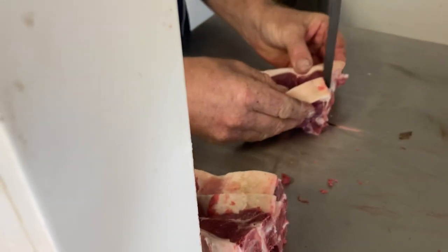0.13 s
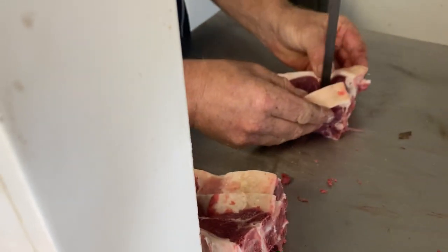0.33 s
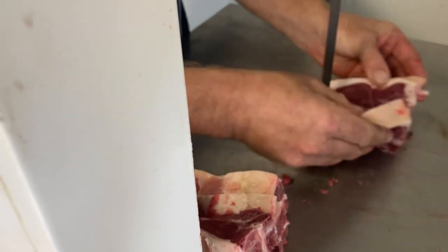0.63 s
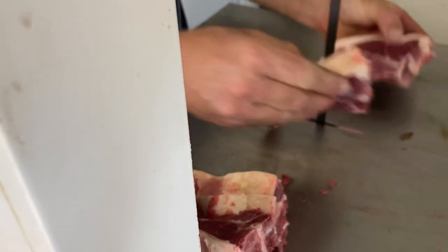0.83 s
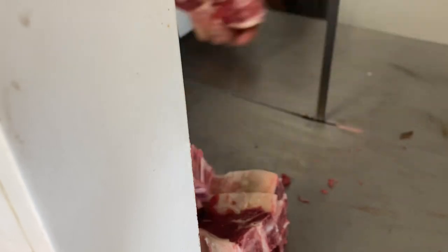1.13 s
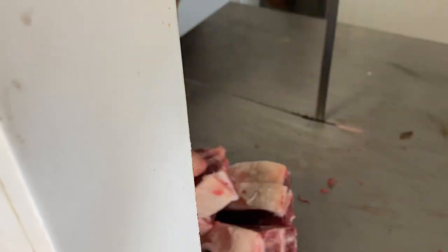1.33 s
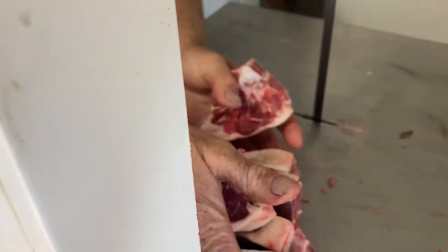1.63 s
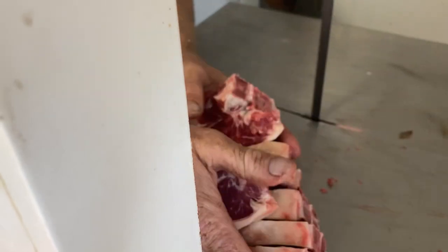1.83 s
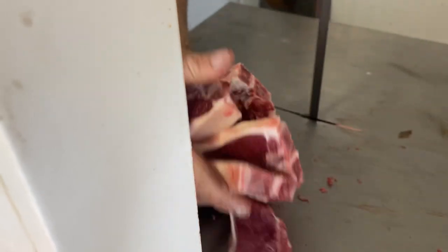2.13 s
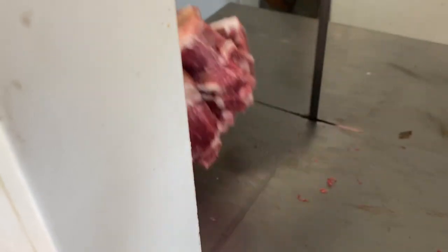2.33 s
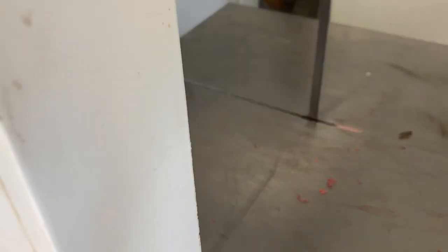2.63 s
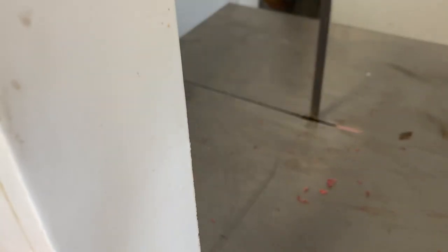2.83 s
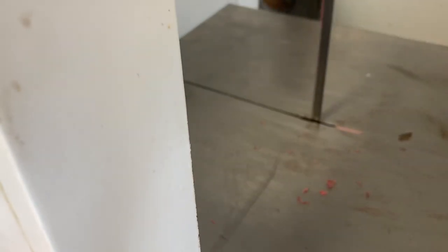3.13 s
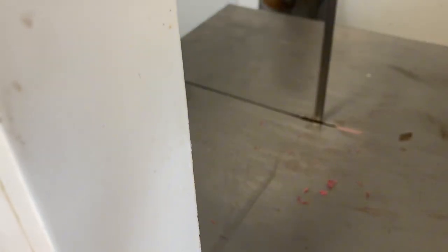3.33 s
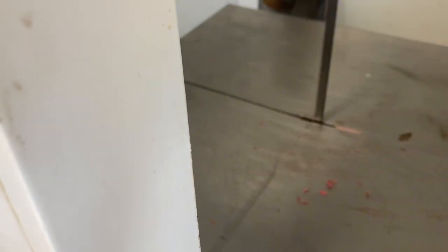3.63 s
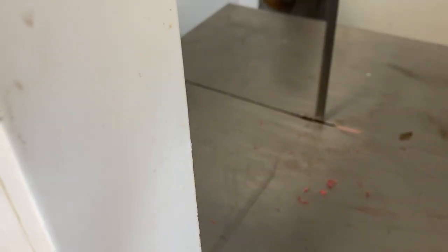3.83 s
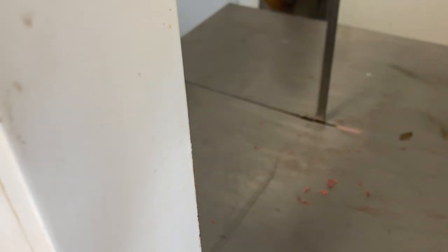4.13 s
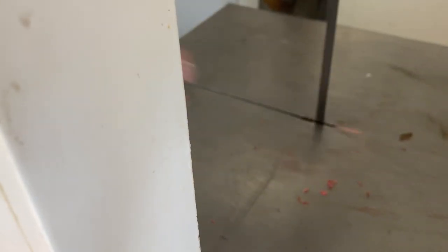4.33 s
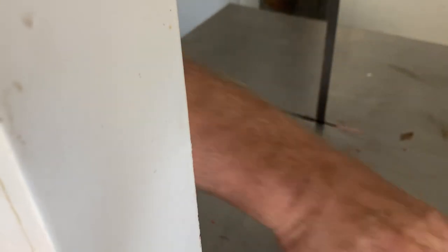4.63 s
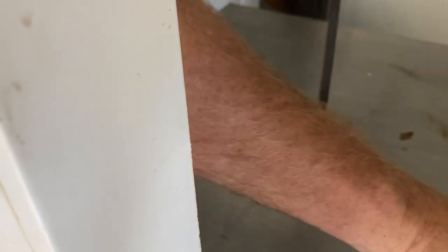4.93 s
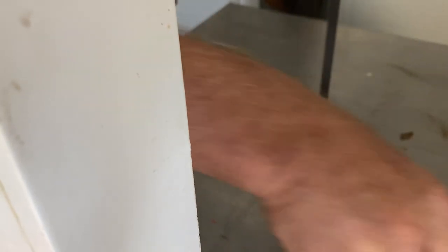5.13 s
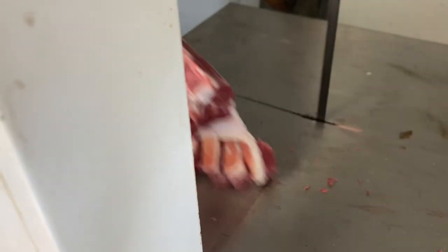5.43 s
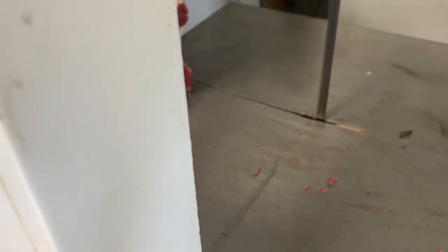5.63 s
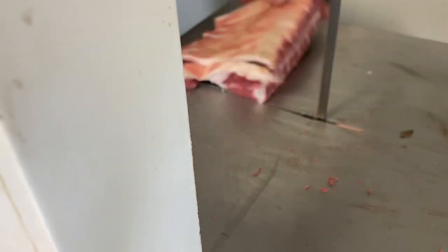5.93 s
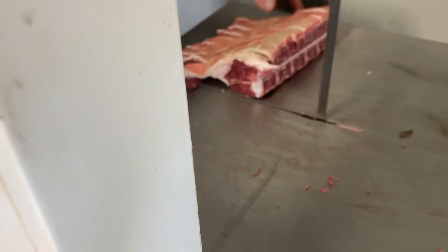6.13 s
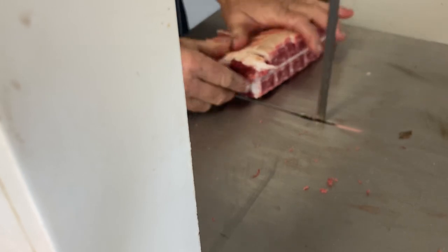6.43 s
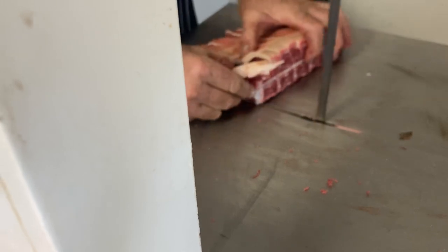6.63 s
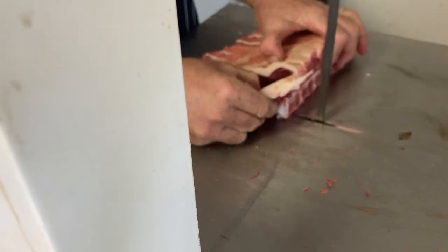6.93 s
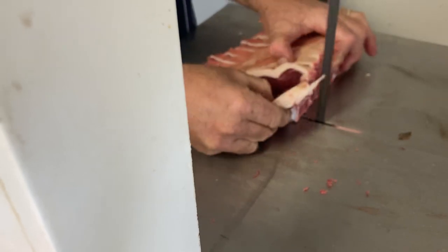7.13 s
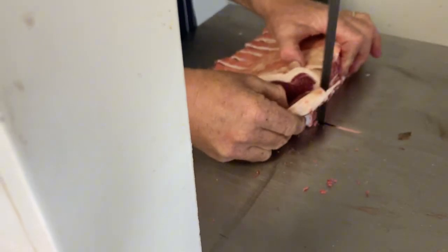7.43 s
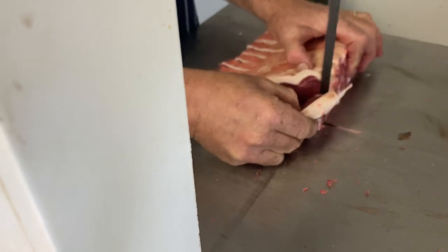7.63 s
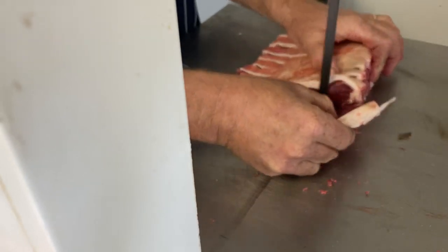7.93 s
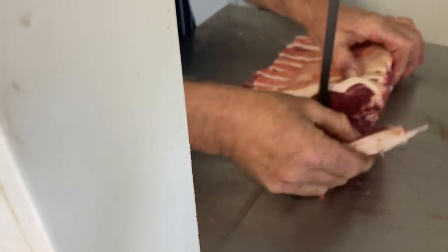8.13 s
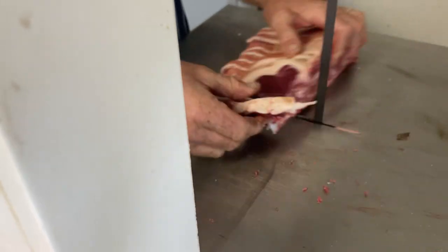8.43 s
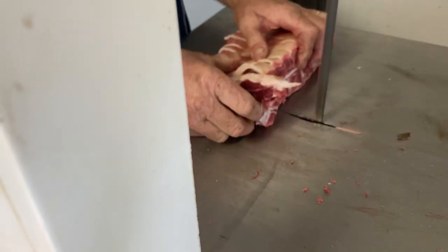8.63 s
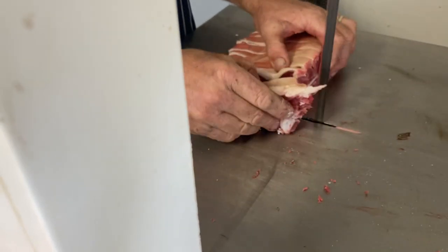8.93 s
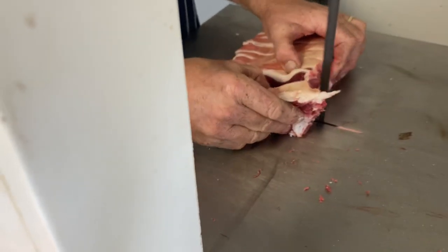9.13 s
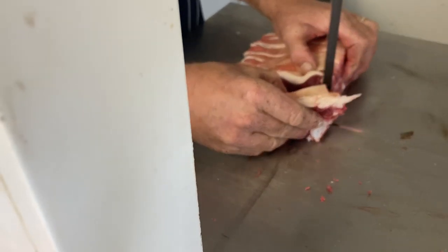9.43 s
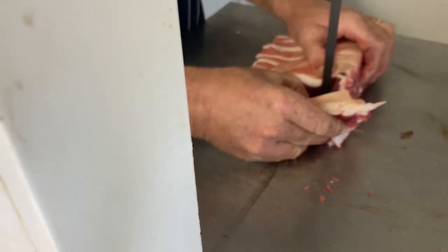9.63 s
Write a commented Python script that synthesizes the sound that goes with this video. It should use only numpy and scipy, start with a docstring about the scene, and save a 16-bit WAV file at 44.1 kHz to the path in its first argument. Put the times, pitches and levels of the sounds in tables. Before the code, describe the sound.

Close by a butcher's bandsaw in a hard-walled workroom, a low motor hum throbs unevenly about two and a half times a second, with band whirr, faint bearing whine and fine wet hiss. From 0 to 0.3 seconds teeth rasp harshly through meat on the bone; a second bite from about 0.4 snags, chatters and gives a rough, high squeal near 0.5. The cutting rings away and the hum returns. Small wet ticks come at intervals from 1.1 to 5.7. Between 2.0 and 3.1, nine soft low knocks repeat quickly and evenly; a brief scuff follows at 3.6. The saw runs freely, its hum growing stronger, until a bright cut at 7.5 chatters and sings, ending around 8 in a judder falling in pitch. A wet tick comes at 8.9. Another cut at 9.3 snags and rings, and its slice judders loose at 9.8. Hum and whirr dip during cuts.

```python
"""First a butcher's bandsaw rasps through meat on the bone, close by in a hard-walled workroom: chips make the rasp,
resonances and the tooth tone make the blade's free span chatter and ring, and the blade squeals once.
Under it tones make the motor hum and throb, and coloured noise makes the band whirr; both are quieter during cuts.
Between cuts: bursts of noise for wet ticks and one short scuff, low modes for a scrap knocking round with the wheel.
In the later cuts the slice comes away with a judder of falling pitch."""
import sys
import numpy as np
from scipy import signal
from scipy.fft import rfft, irfft, next_fast_len
from scipy.io import wavfile
from scipy.ndimage import map_coordinates

SR = 44100
rng = np.random.default_rng(int(sys.argv[2]) if len(sys.argv) > 2 else 0)


def store_pcm(level_fs):
    """Save levels as 16-bit WAV."""
    pcm = np.round(np.clip(level_fs, -1, 1) * 32767).astype(np.int16)
    wavfile.write(sys.argv[1], SR, np.atleast_2d(pcm).T)


N = 431738


def amp(db):
    """Decibels to gain."""
    return 10 ** (np.asarray(db) / 20)


def unit(x):
    """Scale to rms 1."""
    return x / np.sqrt(np.mean(x ** 2) + 1e-20)


def along(points, hz):
    """(Hz, value) points read on a log frequency axis."""
    f, v = np.transpose(points)
    return np.interp(np.log(hz + 1), np.log(f + 1), v)


def curves(rows):
    """One value per sample for each column after the time."""
    s, *cols = np.transpose(rows)
    return [np.interp(np.arange(N) / SR, s, c) for c in cols]


def wobble(rate):
    """A smooth random curve, rate knots a second."""
    count = int(N * rate / SR) + 4
    # a spline through the knots, read at eight points per knot
    fine = np.arange(count * 8) / 8
    smooth = map_coordinates(rng.standard_normal(count), [fine])
    return np.interp(np.arange(N) * rate / SR, fine, smooth)


def filtered(x, response):
    """x passed through a response given as a function of frequency."""
    m = next_fast_len(N + SR // 2)
    return irfft(rfft(x, m) * response(np.fft.rfftfreq(m, 1 / SR)), m)[:N]


def noise(spectrum):
    """Noise of rms 1 with the given colour."""
    return unit(filtered(rng.standard_normal(N), lambda f: amp(along(spectrum, f))))


def tone(hz):
    """A sine of rms 1 that follows a pitch curve."""
    return np.sqrt(2) * np.sin(2 * np.pi * np.cumsum(hz) / SR)


def add(track, s, sound):
    """Mix a sound into the track at time s."""
    part = track[round(s * SR):][:len(sound)]
    part += sound[:len(part)]


def resonances(modes, f):
    """Summed response of (Hz, width Hz, dB) resonances."""
    return sum(amp(db) * 1j * f * w / (c * c - f * f + 1j * f * w) for c, w, db in modes)


def envelope(start, length, shape):
    """Gain that rises to the start, tilts through the hold (1 at its middle) and dies away."""
    attack, db_per_s, t60 = shape
    gain = np.zeros(N)
    first = max(0, int((start - attack) * SR))
    last = min(N, int((start + length + 2 * t60) * SR))
    i = np.arange(first, last)
    t = i / SR - start
    rise = np.clip(1 + t / attack, 0, 1) ** 2
    tilt_db = db_per_s * (np.clip(t, 0, length) - length / 2)
    decay_db = -60 * np.maximum(t - length, 0) / t60
    gain[i] = rise * amp(tilt_db + decay_db)
    return gain


def chips(rate, scatter_db, life):
    """Teeth break off chips at uneven moments, each a burst of its own size that fades over its life (s)."""
    bites = (rng.random(N) < rate / SR) * amp(scatter_db * rng.standard_normal(N))
    force = signal.fftconvolve(bites, np.exp(-np.arange(SR // 50) / SR / life))[:N]
    return force * rng.standard_normal(N)


# The hum and whirr between cuts. Each row: time in seconds, level in dB before ducking and gains.
FREE_RUNNING = [(0.3, -22), (1.06, -25.5), (1.31, -20.5), (2.8, -20.5), (7.4, -15.5), (9.3, -16.5)]
DUCK_DB, DUCK_IN_S, DUCK_OUT_S = 5.5, 0.094, 0.12  # depth in the loudest cut, time to sink, time to return
DUCK_HOLD_S = 0.092  # the level stays down this long after a cut


def background_level():
    """Level in dB: the hum and whirr grow quieter during each cut, more in a louder one, then return."""
    t = np.arange(N) / SR
    duck = np.zeros(N)
    for s, length, _, rasp_db, *_ in CUTS:
        sinking = (t - s) / DUCK_IN_S
        returning = 1 - (t - s - length - DUCK_HOLD_S) / DUCK_OUT_S
        duck += np.clip(np.minimum(sinking, returning), 0, 1) * amp(rasp_db)
    return curves(FREE_RUNNING)[0] - DUCK_DB * (duck / duck.max()) ** 2


# Hum and shaft tones. Each row: pitch in Hz, relative level in dB, scale of the pitch wander in Hz.
HUM_TONES = [(100.2, -1, 0.085), (199.8, -22, 0.605), (88.8, -18, 1.16), (60.8, -34, 0.36),
             (221.6, -28, 2.01)]
# Tight spots in each lap of the band. Each row: place as share of the lap, typical dip of the hum in dB,
# half-width (to 1/e) as share of the lap.
TIGHT_SPOTS = [(.03, 4, 0.052), (.16, 2.5, 0.079), (.485, 6, 0.041), (.56, 3, 0.042), (.76, 2.5, 0.078)]
LAP_HZ = 2.519  # laps of the band a second


def motor(throb_db=0.38, uneven=0.18, gain_db=0.98):
    """Hum and shaft tones throb, sagging at each tight spot of the circling band."""
    lap = np.arange(N) / SR * LAP_HZ
    sag_db = np.zeros(N)
    for at, db, width in TIGHT_SPOTS:
        from_spot = (lap - at + .5) % 1 - .5
        sag_db += db * np.exp(-(from_spot / width) ** 2)
    swing_db = throb_db * wobble(17) - sag_db * (1 + uneven * wobble(6.9))
    # each sag also pulls the phase, so the side tones lie below the hum
    throb = np.conj(amp(signal.hilbert(swing_db, next_fast_len(N))[:N]))
    lines = np.zeros(N, complex)
    for hz, db, wander in HUM_TONES:
        lines += amp(db) * np.exp(2j * np.pi * np.cumsum(hz + wander * wobble(3)) / SR)
    return amp(background_level() + gain_db) * np.sqrt(2) * np.real(throb * lines)


def steel_table(x, ring_db=-6, t60=0.12):
    """The sheet-steel table adds a thicket of short-lived modes, made as decaying noise."""
    t = np.arange(SR // 5) / SR
    modes = rng.standard_normal(len(t)) * amp(-60 * t / t60)
    return unit(x + amp(ring_db) * signal.fftconvolve(x, modes / np.linalg.norm(modes))[:N])


# Whirr of the rubbing band. Each row: frequency in Hz, relative level in dB per Hz.
WHIRR_COLOUR = [(880, -42), (1500, -23), (1550, -8), (1980, -10), (2250, -12.5), (2390, -14.5),
                (2770, -2.5), (3250, -12.5), (3890, -13.5), (4220, -4.5), (4650, -3.5), (5650, -8.5),
                (6000, -18), (6570, -11), (9000, -29), (11700, -38), (19800, -120)]
# Rumble of wheels and housing. Each row: frequency in Hz, relative level in dB per Hz.
HOUSING_COLOUR = [(25, -22), (55, -13), (85, -18), (135, 2), (170, -4), (215, -2.5), (255, -6), (310, -8.5),
                  (375, -3), (490, -3.5), (600, -7), (800, -9.5), (1230, -5), (1450, -11.5), (1700, -26),
                  (2600, -54)]
# The band's resonances between its guides. Each row: centre in Hz, width in Hz, relative level in dB.
GUIDE_MODES = [(2466, 78, -1.5), (2690, 33, -6), (2863, 81, -4), (3653, 76, -10.5), (4320, 62, -11.5),
               (4613, 51, -4), (5515, 52, -5)]
# Bearing tones. Each row: mean pitch in Hz, relative level in dB.
BEARING_TONES = [(500.5, -12.5), (958, -18.5), (1249, -12.5), (1350, -16.5), (1453, -18), (2408, -16),
                 (2461, -14), (2677, -12.5), (2852, -17.5), (4323, -21), (4610, -21), (5566, -19.5),
                 (6379, -24)]


def running_band(below_hum_db=-18, frame_db=1, whirr_db=-2, guides_db=-6, flutter_db=0.5):
    """The band rubs its guides and shakes the housing; wheel bearings whine. All rise and fall with the hum."""
    level_db = background_level()
    steel = unit(filtered(rng.standard_normal(N), lambda f: resonances(GUIDE_MODES, f)))
    rub = amp(whirr_db) * steel_table(noise(WHIRR_COLOUR)) + amp(guides_db + 1.17 * wobble(12)) * steel
    housing = amp(frame_db + 0.92 * wobble(14)) * steel_table(noise(HOUSING_COLOUR))
    whine = np.zeros(N)
    for hz, db in BEARING_TONES:
        whine += amp(db + 2.35 * wobble(25)) * tone(hz + np.sqrt(hz) / 5 * wobble(70))
    return amp(level_db + below_hum_db) * (amp(flutter_db * wobble(22)) * rub + housing + whine)


# Fine hiss of the wet band. Each row: time in seconds, level in dB relative to the background level.
WET_LEVEL = [(0.9, -30.5), (2.5, -25.5), (3.4, -30), (4.7, -32), (5.65, -26), (6.4, -29.5), (7.25, -26.5),
             (8.6, -30.5)]
# Colour of hiss and specks. Each row: frequency in Hz, relative level in dB per Hz.
HISS_COLOUR = [(4120, -5), (7000, 1), (10100, 0), (15100, -1), (15700, -3)]


def wet_band(hiss_db=0.0, specks_db=-4.0):
    """Moisture hisses on the steel and specks of meat tick through the guides."""
    level_db = background_level() + curves(WET_LEVEL)[0]
    bursts = chips(rate=120, scatter_db=6, life=0.0037)
    specks = unit(filtered(bursts, lambda f: amp(along(HISS_COLOUR, f))))
    hiss = amp(hiss_db + 2.7 * wobble(25)) * noise(HISS_COLOUR)
    return amp(level_db) * (hiss + amp(specks_db) * specks)


# Modes of the blade's free span. Each row: centre in Hz, width in Hz, level in dB over the broad response.
BLADE_MODES = [(467, 24, 11.5), (705, 110, 1.5), (971, 78, 7.5), (1324, 29, 9.5), (1544, 35, 2.5),
               (1823, 36, 13), (2306, 53, 10.5), (2748, 34, 16), (3106, 160, 5), (3640, 47, 7),
               (4620, 53, 13.5), (5070, 92, 8.5), (5460, 90, 10), (6020, 87, 8), (6610, 130, 6),
               (7310, 140, 7.5), (8220, 53, 5), (8580, 56, 10), (9580, 70, 6), (10130, 37, -3)]


def blade_span(x, spectrum):
    """The free span of the blade rings in its modes on top of a broad response."""
    return unit(filtered(x, lambda f: amp(along(spectrum, f)) * (1 + resonances(BLADE_MODES, f))))


TOOTH_HZ = 924  # teeth passing a second, on average


def tooth_tone(waver_hz=16, flicker_db=2.5, octave_db=-14):
    """The teeth catch unevenly, so their tone and its octave are rough."""
    pitch = TOOTH_HZ + waver_hz * wobble(160)
    octave = amp(octave_db + 1.7 * wobble(60)) * tone(2 * pitch)
    return amp(flicker_db * wobble(60)) * (tone(pitch) + octave)


# Cuts through bone. Each row: start in seconds, length in seconds, time to enter in seconds, then levels in dB
# before each part's own gain: rasp of the teeth, deeper bite, blade chatter, blade ring.
CUTS = [(0.0, 0.27, 0.02, -25.5, -32.5, -36.5, -37.5), (0.381, 0.192, 0.049, -28.5, -37.5, -41.5, -49),
        (7.521, 0.26, 0.068, -21.5, -31, -43, -41.5), (9.334, 0.28, 0.011, -22.5, -36.5, -40, -41)]
# Colours of the teeth's rasp, the deeper bite and the blade's chatter.
# Each row: frequency in Hz, relative level in dB per Hz.
RASP_COLOUR = [(1000, -37), (2500, -7), (4000, -9), (5500, -4.5), (7500, -2), (10500, -0.5), (13000, 3),
               (16500, 2)]
BITE_COLOUR = [(500, -10), (1200, -1.5), (2000, 1), (2800, -3.5), (3800, 3.5), (4700, -2), (6500, -3),
               (12000, -17)]
CHATTER_COLOUR = [(150, -18), (300, -5.5), (480, -0.5), (690, 2), (1000, -5), (1500, -1.5), (2200, -21.5),
                  (4500, -28), (9000, -45)]
# How the rasp moves: change while in the bone in dB per s, release t60 in seconds.
RASP_SHAPE = (-12, 0.095)
# How the other parts move: attack in seconds, change while in the bone in dB per s, release t60 in seconds.
BITE_SHAPE = (0.05, 0, 0.36)
CHATTER_SHAPE = (0.042, 18, 0.41)
RING_SHAPE = (0.06, 32, 0.8)


def cutting(rasp_gain_db=1.23, bite_gain_db=1, chatter_gain_db=2.0, ring_gain_db=-0.5, shove_db=-26, uneven_db=0.5):
    """The teeth rasp hardest on entering the bone; deeper in, the blade's span chatters and rings more and more."""
    parts = np.zeros((4, N))
    for s, length, enter, *levels in CUTS:
        shapes = (enter, *RASP_SHAPE), BITE_SHAPE, CHATTER_SHAPE, RING_SHAPE
        parts += [amp(db) * envelope(s, length, shape) for db, shape in zip(levels, shapes)]
    rasp, bite, chatter, ring = parts
    dust = blade_span(chips(rate=6000, scatter_db=1.5, life=0.00064), RASP_COLOUR)
    dust *= amp(rasp_gain_db + 0.95 * wobble(35))
    splinters = blade_span(chips(rate=2700, scatter_db=6, life=0.00051), BITE_COLOUR)
    splinters *= amp(bite_gain_db + uneven_db * wobble(25))
    shake = blade_span(chips(rate=1200, scatter_db=5.0, life=0.0016), CHATTER_COLOUR)
    shake *= amp(chatter_gain_db + uneven_db * wobble(25))
    # low rumble of the push
    shove = amp(shove_db) * noise([(15, -10), (40, -13), (80, 9), (300, -38), (1000, -90)])
    singing = ring * amp(ring_gain_db) * tooth_tone()
    return rasp * (dust + shove) + bite * splinters + chatter * shake + singing


# The teeth snag on denser bone. Each row: time in seconds, then levels in dB before each part's own gain:
# splinters, blade chatter, blade ring.
SNAGS = [(0.135, -32, -46, -33), (0.23, -46, -35, -40), (0.285, -50, -39, -35), (0.488, -32, -28.5, -45),
         (0.555, -31, -38.5, -42), (7.645, -49, -46, -32), (7.79, -33, -34.5, -27.5),
         (8.015, -31, -31.5, -26), (9.39, -29, -33, -46), (9.435, -28.5, -51, -31.5),
         (9.605, -31.5, -34, -25)]
SNAG_S, SNAG_SHAPE = 0.018, (0.028, 0, 0.23)  # length (s); (attack s, dB per s, release t60 s)


def snags(splinter_db=0, chatter_db=1.5, ring_db=-2):
    """A snag tears off a spray of splinters, jolts the blade and makes it sing at the tooth rate."""
    parts = np.zeros((3, N))
    for s, *levels in SNAGS:
        parts += amp(levels)[:, None] * envelope(s - SNAG_S / 2, SNAG_S, SNAG_SHAPE)
    splinters, chatter, ring = parts
    spray = blade_span(chips(rate=4000, scatter_db=4.5, life=0.00038), BITE_COLOUR)
    jolt = blade_span(chips(rate=2500, scatter_db=5, life=0.0011), CHATTER_COLOUR)
    singing = amp(ring_db) * ring * tooth_tone()
    return amp(splinter_db) * splinters * spray + amp(chatter_db) * chatter * jolt + singing


# The squeal: start in seconds, length in seconds, level in dB before the gains of shriek and grind.
SQUEAL = (0.485, 0.09, -24)
# How it moves: attack in seconds, change in dB per s, release t60 in seconds.
SQUEAL_SHAPE = (0.082, -105, 0.13)
# Its partials. Each row: multiple of the pitch, relative level in dB.
SQUEAL_PARTIALS = [(0.749, -12), (1, 0.5), (1.249, -10), (1.501, -19), (1.75, -12), (1.999, -9),
                   (2.499, -18), (2.75, -19), (3, -25), (3.75, -25)]
SQUEAL_HZ = 3686  # about four times the tooth rate


def squeal(gain_db=-2.0, rough_hz=58, grind_db=-9):
    """Pinched in the kerf, the blade shrieks in rough, wavering partials and grinds along the bone."""
    s, length, level_db = SQUEAL
    shriek = np.zeros(N)
    for k, db in SQUEAL_PARTIALS:
        shriek += amp(db + 0.96 * wobble(177)) * tone(k * SQUEAL_HZ + rough_hz * wobble(500))
    grind = noise([(2000, -27), (3100, -3), (3700, 0), (4600, 1), (7500, -4), (12000, -21)])
    swell = amp(level_db) * envelope(s, length, SQUEAL_SHAPE)
    return swell * (amp(gain_db) * shriek + amp(grind_db) * grind)


# Clear wet ticks of meat and of scraps on the blade. Each row: time in seconds, level in dB before the tick gain.
TICKS = [(1.0705, -32.5), (1.7045, -34), (2.1311, -32.5), (2.6, -33), (3.797, -32), (4.4433, -33),
         (4.8763, -32), (5.7448, -33), (8.8717, -31.5)]
# The scuff: start in seconds, length in seconds, level in dB.
SCUFF = (3.625, 0.02, -33)
# How it moves: attack in seconds, change in dB per s, release t60 in seconds.
SCUFF_SHAPE = (0.02, -150, 0.16)


def handling(tick_db=-2, tick_t60=0.065):
    """Moist meat ticks as it peels from hands and steel, in decaying noise bursts; something scuffs once."""
    bursts, t = np.zeros(N), np.arange(SR // 8) / SR
    for s, db in TICKS:
        add(bursts, s, amp(db + tick_db - 60 * t / tick_t60))
    ticks = bursts * noise([(1500, -26), (5000, 0.5), (8000, -1), (14000, -3.0)])
    s, length, db = SCUFF
    scrape = noise([(100, -17), (300, -2), (900, -1), (1900, -2), (2500, 1), (3200, -15), (8000, -40)])
    return ticks + amp(db) * envelope(s, length, SCUFF_SHAPE) * scrape


# What the knocks ring with. Each row: pitch in Hz, typical relative level in dB, t60 in seconds.
KNOCK_MODES = [(218.5, -13, 0.3), (374, -7, 0.045), (420, -7, 0.042), (471, -4.5, 0.074), (540, -18, 0.019),
               (690, -11, 0.036), (868, -8.5, 0.057), (2230, -12.5, 0.037)]
KNOCK_START_S, KNOCK_DB, WHEEL_HZ = 2.016, -15, 7.54  # first knock, gain of all knocks, wheel turns a second
KNOCK_LAST_DB = -2.5  # the last knock is weaker than the others as the scrap falls off


def knocks(count=9, attack=0.0056, scatter_db=2.5, squash_db=-11.5, squash_t60=0.14):
    """Once a wheel turn the scrap is squashed under the band: a soft puff and the same low modes at new strengths."""
    ringing, puffs, t = np.zeros(N), np.zeros(N), np.arange(SR // 3) / SR
    for turn in range(count):
        s = KNOCK_START_S + turn / WHEEL_HZ
        blow = amp(KNOCK_LAST_DB * (turn == count - 1)) * (1 - np.exp(-t / attack))
        ring = np.zeros(len(t))
        for k, (hz, level, t60) in enumerate(KNOCK_MODES):
            strength = amp(level + rng.normal(0, scatter_db) - 60 * t / t60)
            # neighbouring modes start in opposite directions
            ring += (-1) ** k * strength * np.sin(2 * np.pi * hz * t)
        add(ringing, s, blow * ring)
        add(puffs, s, blow * amp(squash_db - 60 * t / squash_t60))
    air = noise([(120, -17), (260, -7), (480, 2.5), (850, -7.5), (1300, -14), (2400, -17), (4000, -38)])
    return amp(KNOCK_DB) * (ringing + puffs * air)


# The slice comes away from the blade. Each row: start in seconds, length in seconds,
# judder level in dB before the gains of its parts.
PARTINGS = [(7.984, 0.125, -29), (9.78, 0.14, -24)]
# How the judder moves: attack in seconds, change in dB per s, release t60 in seconds.
PARTING_SHAPE = (0.057, 10, 0.43)
JUDDER_HZ, JUDDER_OCTAVES_PER_S = 850, 7.5  # pitch at first, and its fall as the slice loosens


def parting(ring_db=-3, flap_db=-2.5, flap_width_hz=75, crumbs_db=-10, dust_db=-11, crumbs_shape=(0.05, -60, 0.35)):
    """The last of the bone crumbles; the loose slice judders against the blade at a falling pitch."""
    track, t = np.zeros(N), np.arange(N) / SR
    shake = blade_span(chips(rate=2500, scatter_db=-1, life=0.0014), CHATTER_COLOUR)
    shake += amp(ring_db) * tooth_tone()
    teeth = chips(rate=4000, scatter_db=3.5, life=0.0004)
    crumbs = amp(crumbs_db) * blade_span(teeth, BITE_COLOUR) + amp(dust_db) * blade_span(teeth, RASP_COLOUR)
    for s, length, db in PARTINGS:
        # the pitch falls one octave and stays there
        pitch = JUDDER_HZ * 2 ** -np.clip(JUDDER_OCTAVES_PER_S * (t - s), 0, 1.0)
        flap = amp(flap_db) * wobble(2 * flap_width_hz) * tone(pitch)
        judder = envelope(s, length, PARTING_SHAPE) * (shake + flap)
        track += amp(db) * (judder + envelope(s, length, crumbs_shape) * crumbs)
    return track


# The workroom's tail. Each row: frequency in Hz, t60 in seconds.
ROOM_T60 = [(100, 0.84), (1000, 0.37), (5000, 0.15), (15000, 0.26)]


def workroom(x, wet_db):
    """Hard walls add a short tail of decaying noise, 5 ms late, that lasts longest in the bass."""
    hz, t, z = signal.stft(rng.standard_normal(SR // 2), SR, nperseg=256)
    decay = amp(-60 * t / along(ROOM_T60, hz)[:, None])
    tail = signal.istft(z * decay, SR, nperseg=256)[1]
    late = np.pad(x, (SR // 200, 0))
    return x + amp(wet_db) * signal.fftconvolve(late, tail / np.linalg.norm(tail))[:N]


def scene():
    """Saw and hands, heard from one point beside the table, the same in both channels."""
    work = workroom(cutting() + snags() + squeal() + handling() + knocks() + parting(), wet_db=-5.5)
    mono = motor() + running_band() + wet_band() + work
    return np.array([mono, mono])


TOP_HZ = 15800  # top of the sound's band


def record(dry):
    """Nothing is kept above TOP_HZ."""
    return np.array([filtered(channel, lambda hz: hz < TOP_HZ) for channel in dry])


dry = scene()
out = record(dry)
store_pcm(out)
```